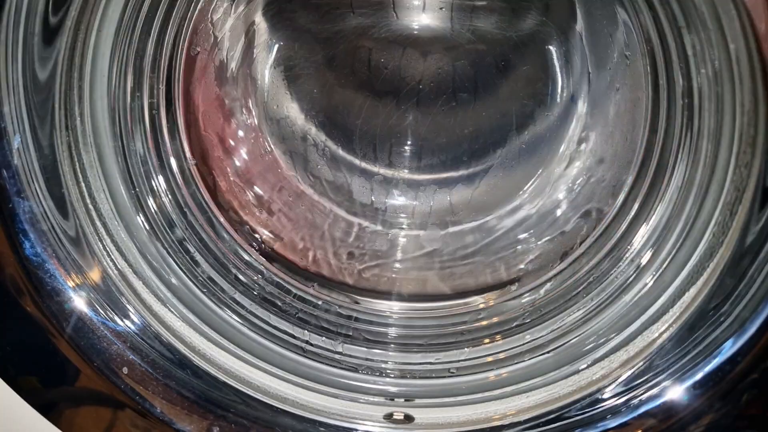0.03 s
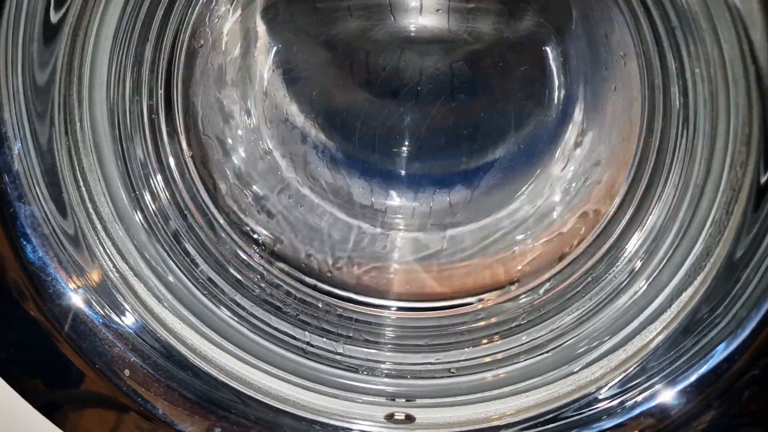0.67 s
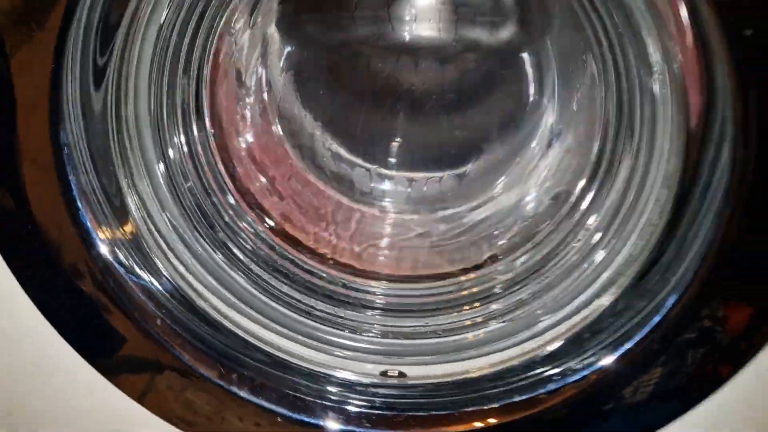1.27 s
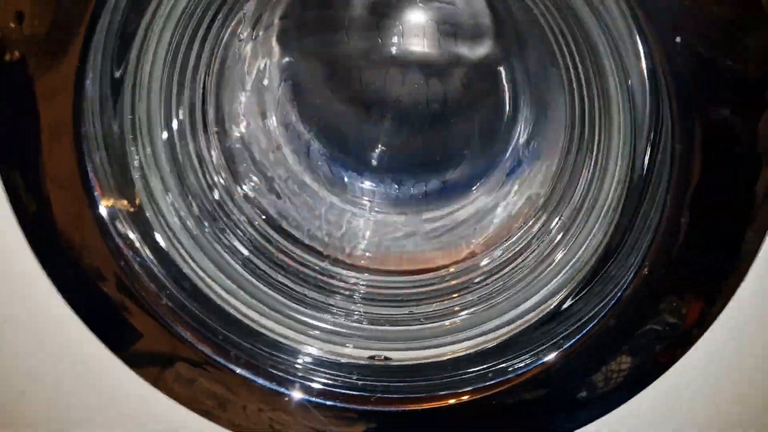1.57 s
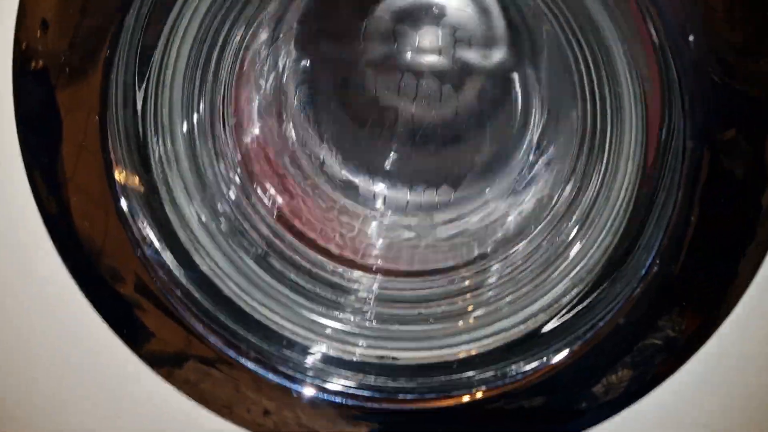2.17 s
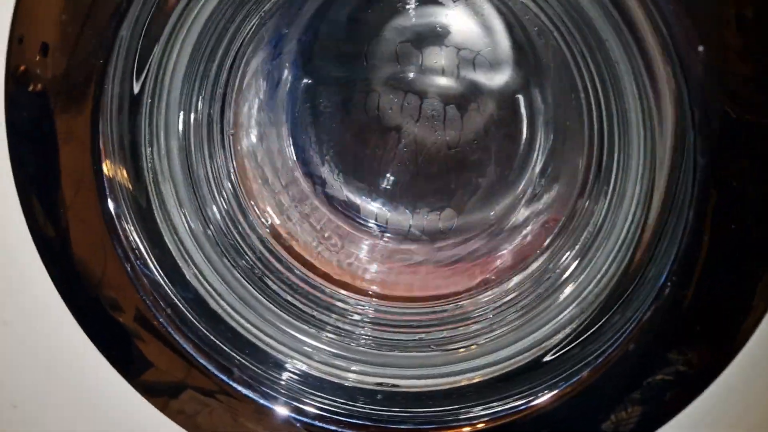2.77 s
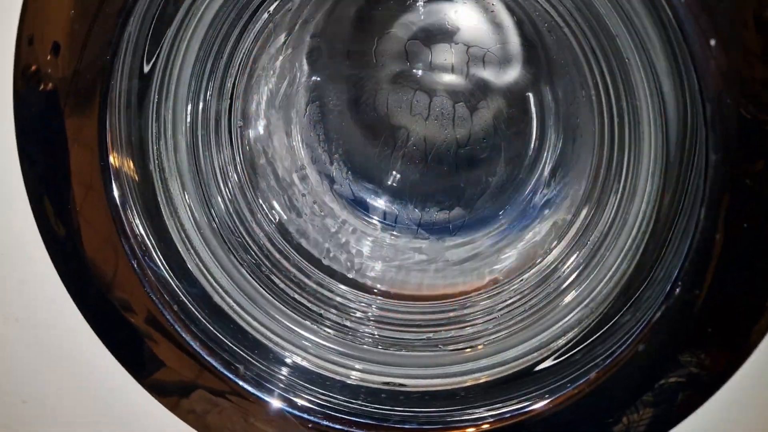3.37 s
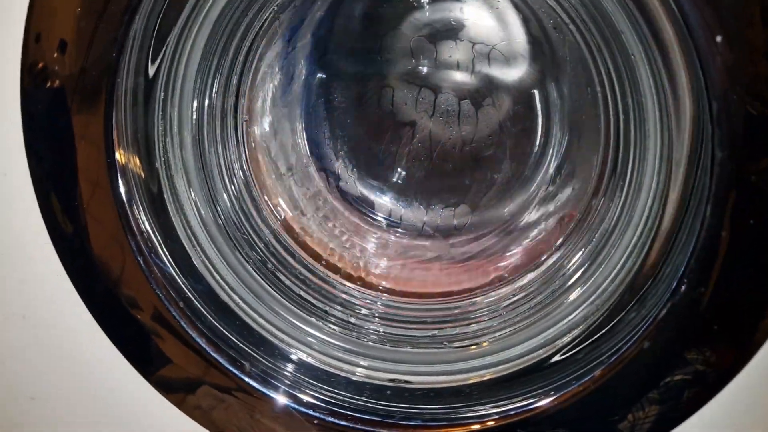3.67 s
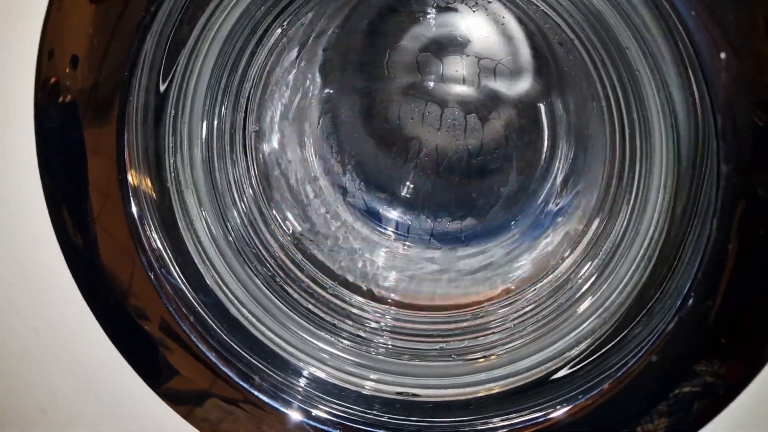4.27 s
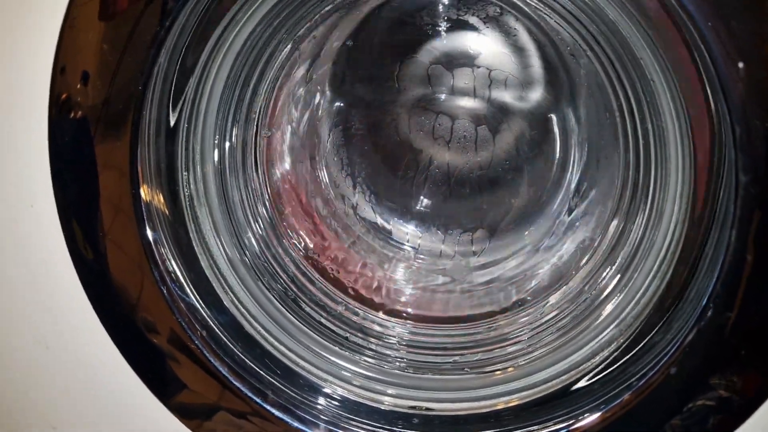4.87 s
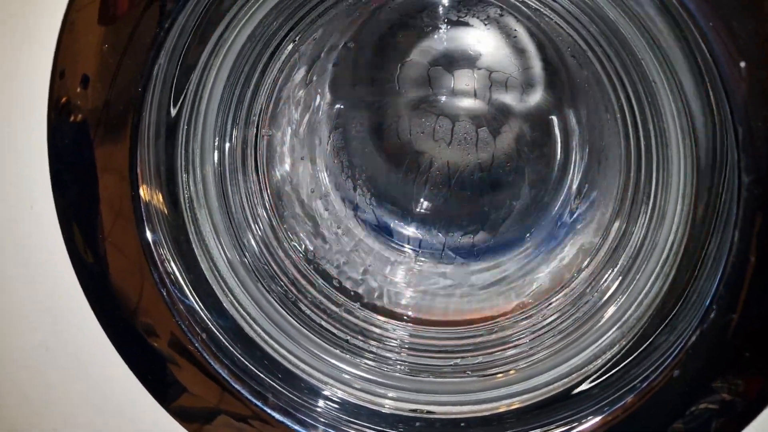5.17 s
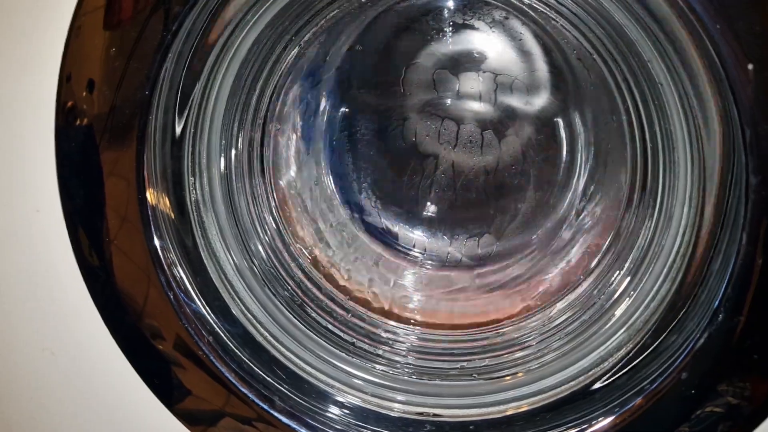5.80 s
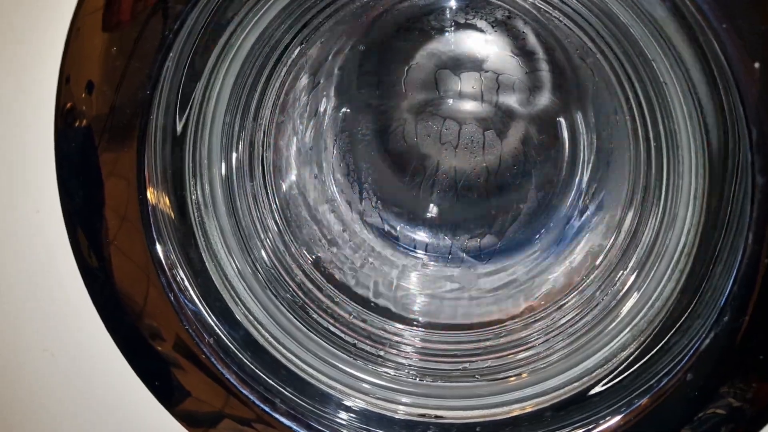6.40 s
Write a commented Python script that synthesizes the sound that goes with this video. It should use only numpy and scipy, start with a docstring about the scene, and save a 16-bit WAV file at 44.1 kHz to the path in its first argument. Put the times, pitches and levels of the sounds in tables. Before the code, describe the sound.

A front-loading washing machine spins fast for the whole six and a half seconds, heard from beside it on a hand-held stereo microphone. The cabinet gives a low, vibrating rumble under a steady motor hum and rushing air. A light hiss and faint, thin high whistles pulse about eighteen times a second. The rumble swells slightly around 2 seconds, and the hiss grows a little from 3.5 seconds.

In front, louder than the machine, a hand bumps the microphone's casing with dull, dry, irregular knocks, some with a sharper tap. They start at about 1 second and crowd together until 3.6 seconds, with a few short, grainy skin rubs between 1.4 and 2.7 seconds. Sparser knocks follow from 4 to 4.8 seconds. After a pause, the loudest thump lands at about 5.9 seconds and a softer one at 6.1, as the machine keeps spinning.

```python
"""Beside a front-loading washing machine spinning at about 1070 rpm, on a hand-held stereo microphone.
The bed is the machine: air rushes, hiss and thin whistles pulse with every turn, the motor hums,
and the unbalanced drum shakes the cabinet at multiples of its speed.
Up front, dull, dry knocks come irregularly through the microphone's casing, with a few short rubs
as the hand shifts its grip."""
import sys
import numpy as np
from scipy import signal
from scipy.fft import rfft, irfft, next_fast_len
from scipy.io import wavfile
from scipy.ndimage import uniform_filter1d, minimum_filter1d

SR = 44100
rng = np.random.default_rng(int(sys.argv[2]) if len(sys.argv) > 2 else 0)


def pcm_store(signal):
    """Save signal as 16-bit PCM."""
    levels = np.round(np.clip(np.atleast_2d(signal), -1, 1) * 32767)
    wavfile.write(sys.argv[1], SR, levels.astype(np.int16).T)


N = 284004
TIME = np.arange(N) / SR

# the drum's spin: (time [s], speed [turns/s], pulse depth [0-1])
SPIN = [(0, 17.83, .55), (1.2, 17.76, .65), (2.0, 17.77, .7), (2.8, 17.83, .9), (3.6, 17.8, 1),
        (4.4, 17.72, 1), (5.2, 17.78, 1), (6.44, 17.76, .85)]
# fader rides, each used as a swing around its own mean: (time [s], level [dB])
RUMBLE_RIDE = [(0.0, -26), (0.68, -27.5), (2.13, -21), (2.96, -27), (3.7, -25), (5.8, -26.5)]  # rumble and cabinet
RUNNING_RIDE = [(0.0, -41.5), (0.58, -41), (2.6, -41), (3.15, -42.5), (5.72, -41.5), (5.8, -41)]  # air and motor
HISS_RIDE = [(0.0, -63.5), (1.44, -61.5), (1.76, -63.5), (3.54, -60.5), (5.69, -61), (5.8, -60)]  # hiss and whistles
# stereo image of all noise: (frequency [Hz], left-right correlation [0-1])
NOISE_IMAGE = [(40, 0.95), (130, 1), (300, 0.89), (600, 0.72), (1200, 0.012), (12000, 0.0071)]
# colour of the drum's rush: (frequency [Hz], level [dB], pan left over right [dB])
RUSH_COLOUR = [(15, -81, 15), (36.8, -45.5, 4), (59, -46, -2), (124.5, -53, 0), (236, -62, 0.5),
               (408, -66.5, -3), (424, -75, 6), (521, -68, -3.5), (960, -75.5, 6), (1130, -82.5, 2.5),
               (1420, -79.5, 5), (2120, -83, -2.5), (2600, -87.5, -0.5), (4130, -91.5, -8),
               (5170, -86, -15.5), (6150, -93.5, -4.5), (7450, -97, 6.5), (8400, -101.5, -1.5),
               (10300, -95.5, 5.5), (12000, -93.5, 5), (13300, -99, 17.5), (14800, -105.5, 14)]
# motor and bearing whistles:
# (pitch [Hz], wander width [Hz], level [dB], pan [dB], flare position [turns], flare swing [dB])
WHISTLE_TONES = [(3311, 8, -71.5, -4, .3, 3), (4068, 20, -77, -9, .3, 2), (5733, 14, -76, -6, .3, 2),
                 (6637, 10, -75, 5, .75, 8), (6673, 10, -76.5, 2, .14, 6), (7395, 18, -74.5, 12, .52, 6),
                 (11519, 40, -83, 8, .74, 7), (13274, 34, -73.5, 14, 0.01, 8)]
# motor hum: (multiple of rotor speed, level [dB], pan [dB])
HUM_PARTIALS = [(3, 0.5, 2), (4, -7, -7.5), (5, -13.5, -6)]
# cabinet shake: (multiple of drum speed, level [dB])
SHAKE_PARTIALS = [(2, -34.5), (3, -29.5), (4, -38.5), (5, -36), (6, -45.5), (7, -39), (9, -48.5),
                  (12, -41.5), (13, -47), (14, -45), (18, -53), (19, -52), (37, -58.5), (39, -57.5),
                  (50, -67)]
# dark and bright layers of a rub: (frequency [Hz], level [dB], pan [dB])
SCRAPE_COLOUR = [(300, 3, -16), (745, 3.5, -14), (1160, -1, -3), (1540, 1, 9), (2150, -9, 4),
                 (3580, -18, 7), (5170, -10.5, -14), (7000, -42, -2), (15000, -52, 3)]
SWISH_COLOUR = [(1000, -4.5, -13), (2270, -5.5, 8.5), (3770, -12, 8.5), (5040, -1, 10), (6360, -15.5, 6),
                (8800, -27, 11), (15000, -35, 9)]
# skin sliding on the casing: (peak time [s], decay [s], level [dB], swish over scrape [dB])
RUB_CUES = [(1.3896, 0.0016, -24, 3.5), (1.42, 0.079, -32, -20), (1.517, 0.018, -28, -15.5),
            (1.905, .025, -45, -0.5), (2.061, 0.017, -42, 4.5), (2.215, 0.031, -36, -12),
            (2.481, 0.02, -32, 3.5), (2.68, .04, -40, -12)]
# ring of the microphone's casing: (frequency [Hz], width [Hz], level [dB], pan [dB])
CASING_RING = [(353, 130, -7, -6), (550, 250, -12, 1), (840, 120, -21, -2), (1260, 160, -22.5, 11),
               (1560, 120, -13.5, 2.5), (2035, 110, -14.5, -4), (5100, 600, -13, -13)]
# the hand knocking on the casing: (time [s], level [dB], hardness [0-1])
KNOCK_CUES = [(1.0647, -9, 0.29), (1.324, -13, 0.35), (1.351, -7.5, 0.13), (1.394, -5, 0.16),
              (1.497, -12.5, .02), (1.513, -18.5, 0.9), (1.6093, -3.5, 0.36), (1.831, -12, 0.24),
              (1.9796, -9, .03), (2.0634, -12.5, 0.64), (2.073, -9, 0), (2.1753, -11.5, 0.63),
              (2.2188, -16.5, 0.6), (2.235, -10.5, 0), (2.4365, -12, 0.53), (2.506, -7, 0),
              (2.6291, -6.5, 0.6), (2.6568, -5, 0.49), (2.7622, -8.5, .22), (2.8425, -10.5, 0.28),
              (2.9583, -6, 0.38), (3.0994, -6, 0.65), (3.2125, -12.5, .35), (3.2416, -9, .56),
              (3.327, -12.5, .33), (3.3676, -6.5, 0.66), (3.587, -11.5, 0), (3.632, -12.5, 0.25),
              (3.995, -6.5, 0), (4.3849, -17, 0.63), (4.4477, -14.5, 0.62), (4.6115, -14, 0.64),
              (4.647, -11, .02), (4.7932, -6, 0.64), (5.8585, 3, 0.31), (6.114, -9.5, 0)]


def from_db(db):
    """Decibels to gain."""
    return 10 ** (np.asarray(db) / 20)


def rms_one(x):
    """Scale to unit rms."""
    return x / np.sqrt(np.mean(x ** 2) + 1e-20)


def peak_one(x):
    """Scale to unit peak."""
    return x / np.abs(x).max()


def curves(rows):
    """One automation curve for each column after the time."""
    times, *columns = np.transpose(rows)
    return [np.interp(TIME, times, column) for column in columns]


def ride(rows):
    """A fader ride, in dB around its mean."""
    level_db, = curves(rows)
    return level_db - level_db.mean()


def panned(x, pan_db):
    """Pan by level difference; positive is left."""
    return x * from_db([[pan_db / 2], [-pan_db / 2]])


def butter(x, hz, kind, order=2):
    """Causal Butterworth filter."""
    return signal.sosfilt(signal.butter(order, hz, kind, fs=SR, output="sos"), x)


def ring(x, hz, width_hz):
    """A resonance with unity gain at its peak."""
    radius, angle = np.exp(-np.pi * width_hz / SR), 2 * np.pi * hz / SR
    feedback = [1, -2 * radius * np.cos(angle), radius ** 2]
    return signal.lfilter(np.array([1, 0, -1]) * (1 - radius ** 2) / 2, feedback, x)


def drift(rate_hz, hop=40, settle=2000):
    """A smooth random wobble of about unit rms."""
    pole = np.exp(-2 * np.pi * hop * rate_hz / SR)
    noise = rng.standard_normal(N // hop + settle + 2)
    slow = signal.lfilter([1], [1, -2 * pole, pole ** 2], noise)[settle:]
    return np.interp(np.arange(N) / hop, np.arange(len(slow)), rms_one(slow))


def stereo_noise(colour):
    """Coloured noise, narrow in the bass and wide in the treble."""
    size = next_fast_len(N)
    log_f = np.log(np.fft.rfftfreq(size, 1 / SR) + 1)
    image_hz, correlation = np.transpose(NOISE_IMAGE)
    alike = np.interp(log_f, np.log(image_hz), correlation)
    mid, side = rfft(rng.standard_normal((2, size)))
    pair = np.sqrt(1 + alike) * mid + np.sqrt(1 - alike) * side * [[1], [-1]]
    hz, db, pan_db = np.transpose(colour)
    eq = from_db([np.interp(log_f, np.log(hz), db + sign * pan_db / 2) for sign in (1, -1)])
    return irfft(pair * eq, size)[:, :N] * np.sqrt(SR) / 2


def swell(turns, position, swing_db):
    """A tremolo that peaks once a turn, at the given position, and keeps a mean power of 1."""
    gain = from_db(swing_db * np.cos(2 * np.pi * (turns - position)))
    return gain / np.sqrt(np.i0(swing_db * np.log(10) / 10))


def rush(turns, depth, rumble_db, air_db, hiss_db, crossovers_hz=(280, 8400)):
    """The drum and its air in three bands; the hiss swells twice a turn, one strong, one weak."""
    noise = stereo_noise(RUSH_COLOUR)
    low, body = [signal.sosfiltfilt(signal.butter(3, hz, fs=SR, output="sos"), noise)
                 for hz in crossovers_hz]
    air = (body - low) * from_db(air_db) * swell(2 * turns, .45, swing_db=.8)
    throb = rms_one(swell(2 * turns, .42, 2.1 * depth) * swell(turns, .78, 1.3 * depth))
    hiss = (noise - body) * from_db(hiss_db) * throb
    return low * from_db(rumble_db) + air + hiss


def whistles(turns, depth, gain_db, waver_db=2.2, peakiness=0.16):
    """Thin motor and bearing tones wander in pitch and flare as the drum swings round."""
    out = np.zeros((2, N))
    for hz, width_hz, level_db, pan_db, position, swing_db in WHISTLE_TONES:
        pitch_hz = hz + width_hz / 2 * drift(10.5)
        tone = np.sqrt(2) * np.sin(2 * np.pi * np.cumsum(pitch_hz) / SR)
        sharpen = swell(2 * turns, 2 * position, peakiness * swing_db * depth)
        flare = rms_one(swell(turns, position, swing_db * depth) * sharpen)
        out += panned(from_db(level_db + waver_db * drift(29)) * tone * flare, pan_db)
    return out * from_db(gain_db)


def motor(gain_db, rotor_hz=184.9, waver_db=2.0, slip_turns=0.029):
    """A hum of a few partials locked to the slightly unsteady rotor."""
    rotor_turns = rotor_hz * TIME + slip_turns * drift(8)
    hum = np.zeros((2, N))
    for multiple, level_db, pan_db in HUM_PARTIALS:
        gain = from_db(level_db + waver_db * drift(9.7))
        hum += panned(gain * np.sin(2 * np.pi * (multiple * rotor_turns + rng.random())), pan_db)
    return np.sqrt(2) * from_db(gain_db) * hum


def cabinet(turns, gain_db, waver_db=2.5, slip_cycles=0.065):
    """The unbalanced load shakes the panels at multiples of the drum speed."""
    shake = np.zeros(N)
    for multiple, level_db in SHAKE_PARTIALS:
        cycles = multiple * turns + rng.random() + slip_cycles * drift(4.1)
        shake += from_db(level_db + waver_db * drift(5.6)) * np.sin(2 * np.pi * cycles)
    return np.sqrt(2) * from_db(gain_db) * shake


def rubs(grain_db=2.0, rise_share=0.55):
    """Skin slides over the casing: a grainy scrape and a brighter swish."""
    scrape, swish = np.zeros((2, N))
    for peak_s, decay_s, level_db, swish_db in RUB_CUES:
        rise = ((peak_s - TIME) / (rise_share * decay_s)) ** 2 / 2
        fall = (TIME - peak_s) / decay_s
        stroke = np.exp(-np.minimum(np.where(TIME < peak_s, rise, fall), 20))
        scrape += from_db(level_db) * stroke
        swish += from_db(level_db + swish_db) * stroke
    friction = scrape * rms_one(stereo_noise(SCRAPE_COLOUR))
    friction += swish * rms_one(stereo_noise(SWISH_COLOUR))
    return friction * from_db(grain_db * drift(77))


def grip_bumps(count=12, from_s=1.25, to_s=2.5, level_db=-15, spread_db=4.5, max_hardness=0.39):
    """Extra knock cues: small, soft bumps scattered over the shift of the grip."""
    offset, strength, hardness = rng.random((count, 3)).T
    times = from_s + (to_s - from_s) * (np.arange(count) + offset) / count
    return list(zip(times, level_db + spread_db * (2 * strength - 1), max_hardness * hardness))


def knock(t, hardness, pad_hz=155, nail_hz=1080, thud_hz=68, click_s=0.00018):
    """One contact swings the casing in a low thud and rings it with a tap and a click."""
    # every contact lands on another spot, so the thud's pitch and each mode's level and pan vary
    (detune, _), *mode_scatter = rng.standard_normal((1 + len(CASING_RING), 2))
    # from finger pad to nail the push gets shorter and brighter, trading thud for tap and click
    contact_hz = pad_hz * (nail_hz / pad_hz) ** hardness
    thud_db = -12 * hardness ** 2
    tap_db = 1.47 - 18 * (1 - hardness)
    click_db = 3.5 - 68 * (1 - hardness)
    push = np.exp(-np.minimum((t * contact_hz / 0.16) ** 2 / 2, 40))
    swing = ring(push, thud_hz * (1 + 0.034 * detune), width_hz=44)
    thud = from_db(thud_db) * peak_one(butter(butter(swing, 190, "low"), 42, "high"))
    tap = from_db(tap_db) * peak_one(butter(push, 0.37 * contact_hz, "high", order=3))
    spike = np.exp(-np.minimum((t / click_s) ** 2, 40))
    click = from_db(click_db) * peak_one(butter(spike, 1200, "high"))
    attack = tap + click
    hit = panned(attack, pan_db=-1.5)
    for (hz, width_hz, level_db, pan_db), (strength, side) in zip(CASING_RING, mode_scatter):
        mode = hz / width_hz * ring(attack, hz, width_hz)
        hit += panned(from_db(level_db + 2 * strength) * mode, pan_db + 4 * side)
    return hit - thud


def knocks(cues, left_lag_s=0.00035):
    """The hand knocks on the casing at each cue; the shock reaches the left side a little later."""
    out = np.zeros((2, N))
    size, lead = SR // 6, SR // 200
    t = (np.arange(size) - lead) / SR - .001  # the push peaks 1 ms after its cue
    for cue_s, level_db, hardness in cues:
        start = int(cue_s * SR) - lead
        out[:, start:start + size] += from_db(level_db) * knock(t, hardness)[:, :N - start]
    return np.array([np.interp(TIME - left_lag_s, TIME, out[0]), out[1]])


def limiter(x, ceiling_db=-0.2, recovery_db_per_s=0.6, attack_s=0.00088):
    """A peak over the ceiling ducks the whole mix, and the gain creeps back."""
    over_db = np.maximum(20 * np.log10(np.abs(x).max(axis=0) + 1e-9) - ceiling_db, 0)
    recovered_db = recovery_db_per_s * TIME
    duck_db = np.maximum.accumulate(over_db + recovered_db) - recovered_db
    ahead = int(attack_s * SR)
    held_db = minimum_filter1d(-duck_db, 2 * ahead)
    return x * from_db(uniform_filter1d(held_db, ahead))


def scene():
    """The drum's angle drives the shake, hiss and whistles; the handling noise sits on top."""
    turns_per_s, depth = curves(SPIN)
    turns = .27 + np.cumsum(turns_per_s) / SR
    rumble_db, running_db, hiss_db = ride(RUMBLE_RIDE), ride(RUNNING_RIDE), ride(HISS_RIDE)
    bed = cabinet(turns, 0.62 * rumble_db - 0.43) + motor(running_db - 46.5)
    bed += rush(turns, depth, 0.61 * rumble_db + 0.08, running_db + 0.05, hiss_db - 2.4)
    bed += whistles(turns, depth, hiss_db + 1)
    return bed + knocks(KNOCK_CUES + grip_bumps()) + rubs()


def record(dry):
    """The limiter ducks on the loudest knock, and the top end is cut steeply."""
    high_cut = signal.ellip(12, .1, 100, 15650, fs=SR, output="sos")
    return signal.sosfilt(high_cut, limiter(dry))


dry = scene()
out = record(dry)
pcm_store(out)
```